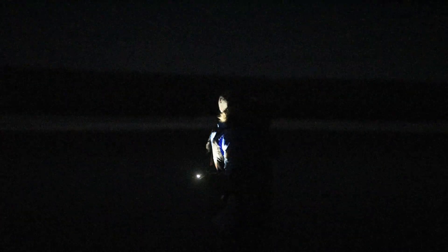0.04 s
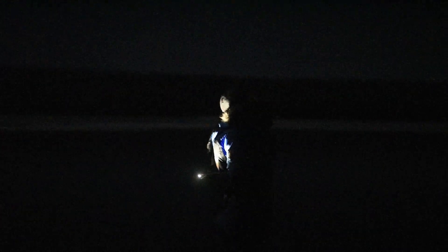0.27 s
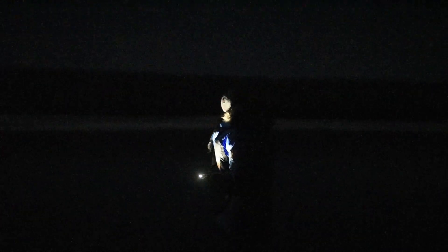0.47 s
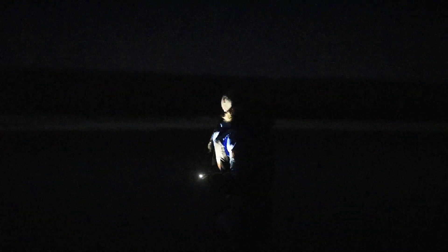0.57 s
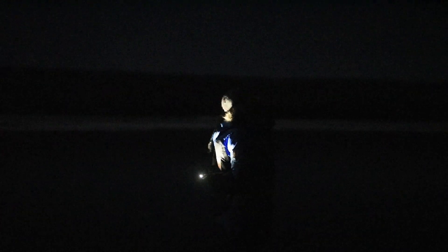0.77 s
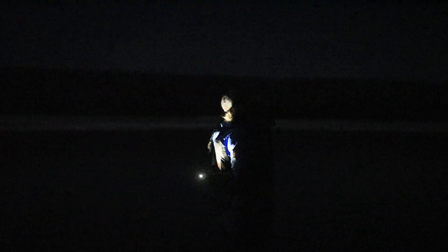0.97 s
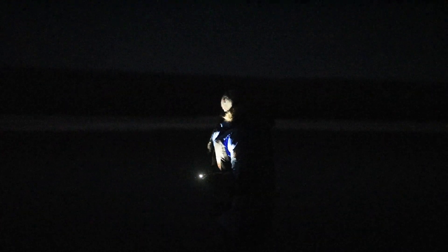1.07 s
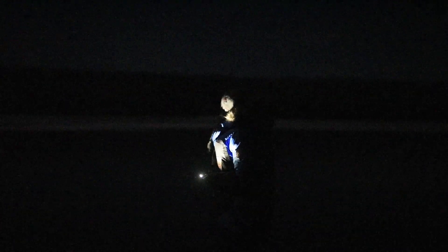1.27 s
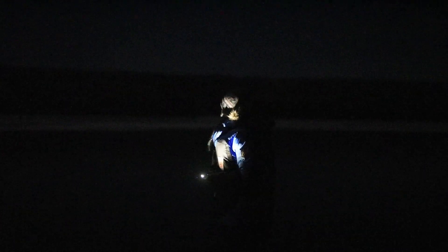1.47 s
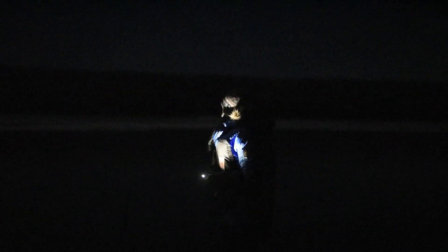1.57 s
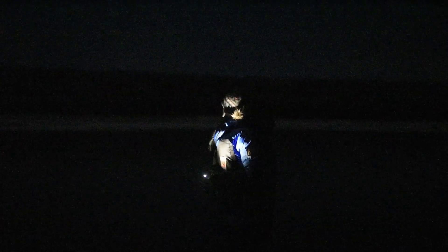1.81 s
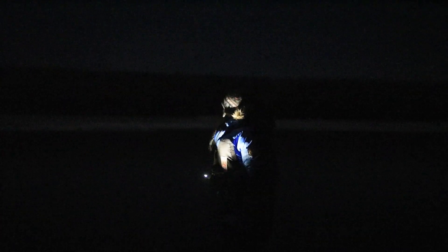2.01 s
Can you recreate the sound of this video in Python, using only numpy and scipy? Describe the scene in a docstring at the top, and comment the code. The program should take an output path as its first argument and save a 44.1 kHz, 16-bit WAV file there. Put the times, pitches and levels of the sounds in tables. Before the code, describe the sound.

A stone strikes a frozen lake, bounces ever faster and skitters away, the ice ringing.

```python
"""A stone thrown onto a frozen lake at night lands, bounces ever faster and skitters away.
Each blow bends the ice: a short singing wave outruns the airborne clack. After the hard landings
the sheet rings on and a low whoop returns. The sliding stone keeps the ice humming and ticking.
Behind it lies still night air, and light wind buffets the right microphone."""
import sys
import numpy as np
from scipy import signal
from scipy.fft import rfft, irfft, next_fast_len
from scipy.io import wavfile
from scipy.ndimage import uniform_filter1d

SR = 44100
rng = np.random.default_rng(int(sys.argv[2]) if len(sys.argv) > 2 else 0)


def pcm_store(signal):
    """Save signal as 16-bit PCM."""
    levels = np.round(np.clip(np.atleast_2d(signal), -1, 1) * 32767)
    wavfile.write(sys.argv[1], SR, levels.astype(np.int16).T)


N = 90404
T = np.arange(N) / SR
SIDE = np.array([[1], [-1]])  # opposite polarity left and right


def amp(db):
    """Decibels to gain."""
    return 10 ** (np.asarray(db) / 20)


def curve(rows):
    """A fader ride through (seconds, dB) points."""
    return amp(np.interp(T, *np.array(rows).T))


def fade(start, seconds):
    """Sudden start and exponential decay."""
    return (T >= start) * np.exp(-np.maximum(T - start, 0) / seconds)


def swell(crest, rise, fall):
    """Bell-shaped envelope with its own rise and fall, in seconds."""
    return np.exp(-.5 * ((T - crest) / np.where(T < crest, rise, fall)) ** 2)


def colour(x, points):
    """Minimum-phase EQ through (Hz, dB) points that keeps the power of white noise."""
    hz, db = np.array(points).T
    size = 2 * next_fast_len(len(x) // 2 + 2048)
    gain = amp(np.interp(np.log(np.fft.rfftfreq(size, 1 / SR) + 1), np.log(hz), db))
    cepstrum = irfft(np.log(gain / np.sqrt(np.mean(gain ** 2))))
    cepstrum[1:size // 2] *= 2
    cepstrum[size // 2 + 1:] = 0
    return irfft(rfft(x, size) * np.exp(rfft(cepstrum)))[:len(x)]


def noise(points):
    """Coloured noise of level 1."""
    return colour(rng.standard_normal(N), points)


def flutter(hz):
    """Smooth random wobble with a spread of 1."""
    hold = int(SR / hz)
    steps = np.repeat(rng.standard_normal(N // hold + 1), hold)
    wobble = uniform_filter1d(uniform_filter1d(steps, hold), hold)[:N]
    return wobble / wobble.std()


def grains(per_second, spread_db):
    """Random tiny impacts of uneven size, level 1."""
    hits = (rng.random(N) < per_second / SR) * rng.standard_normal(N)
    hits *= amp(spread_db * rng.standard_normal(N))
    return hits / hits.std()


def add(out, start, x):
    """Mix a short sound in at its time."""
    i = int(start * SR)
    out[i:i + len(x)] += x[:N - i]


def widen(make, side_db=-10.5):
    """Two draws of a scattered sound, as centre and weaker side."""
    return make() + amp(side_db) * make() * SIDE


# Tone of the night air. Each row: frequency in Hz, relative level in dB.
AIR_EQ = [(40, -19), (150, -41.5), (300, -23), (600, -29), (1100, -34), (2400, -39.5), (4000, -42),
          (7000, -39.5), (10000, -37.5), (13000, -49.5), (16000, -47)]

def night_air():
    """A faint, wide bed of still air."""
    return amp(-64.5) * (noise(AIR_EQ) + 1.18 * noise(AIR_EQ) * SIDE)


# Tone of the wind rumble. Each row: frequency in Hz, relative level in dB.
WIND_EQ = [(15, -13), (30, -7), (52, -1), (90, -5), (140, -11), (220, -24.5), (400, -35), (1000, -84)]
# The gusts. Each row: time in seconds, level on the right in dB.
GUST_RIDE = [(0, -39), (.07, -70), (.082, -43), (.17, -38), (.21, -41.5), (.32, -53.5), (.41, -32),
             (.45, -51), (.48, -32.5), (.63, -37), (.68, -44.5), (.85, -40), (.91, -37), (1.0, -48.5),
             (1.045, -33), (1.14, -37.5), (1.22, -53.5), (1.31, -41.5), (1.355, -38), (1.4, -55),
             (1.52, -49), (1.545, -29.5), (1.6, -43.5), (1.68, -58), (2.05, -55.5)]

def wind(left_db=-25.5):
    """Gusts buffet the right microphone and barely touch the left."""
    return curve(GUST_RIDE) * np.array([amp(left_db) * noise(WIND_EQ), noise(WIND_EQ)])


# Tone of the scrape. Each row: frequency in Hz, relative level in dB.
SCRAPE_EQ = [(800, 2.5), (1500, -7.5), (2400, 1.5), (4200, -7), (6800, -2.5), (8000, -10), (10300, -2.5),
             (13000, -9.5), (16000, -16)]
# Swells of the scrape. Each row: time in seconds, level in dB.
SCRAPE_RIDE = [(0, -65.5), (.3, -76.5), (.5, -67), (.58, -71.5), (.8, -71), (.87, -62.5), (.97, -70),
               (1.18, -70.5), (1.24, -60), (1.31, -68.5), (1.44, -62), (1.6, -62), (1.8, -66), (2.05, -72)]

def scrape():
    """The sliding stone hisses: a dense stream of tiny impacts."""
    return curve(SCRAPE_RIDE) * colour(grains(5500, spread_db=2.5), SCRAPE_EQ)


# Tone of the humming sheet. Each row: frequency in Hz, relative level in dB.
HUM_EQ = [(80, -21), (200, -7), (300, -8), (480, -19.5), (620, -10), (705, -4.5), (755, -0.5), (815, -12),
          (930, -21), (1400, -33), (3000, -44.5)]
# Swells of the hum. Each row: time in seconds, level in dB.
HUM_RIDE = [(0, -70), (.8, -57.5), (1.0, -55.5), (1.25, -50.5), (1.35, -54), (1.41, -46.5), (1.5, -53.5),
            (1.68, -55.5), (1.76, -53.5), (1.86, -53.5), (1.93, -52), (2.05, -51)]

def slide_hum():
    """Small knocks from the sliding stone keep the sheet humming."""
    return curve(HUM_RIDE) * widen(lambda: colour(grains(500, spread_db=3.5), HUM_EQ))


# Tone of the ice chips. Each row: frequency in Hz, relative level in dB.
CHIPS_EQ = [(800, 6.5), (2000, -4), (4500, -6), (9000, -2.5), (12000, -2.5), (16000, -13)]

def chips(start):
    """A landing throws up a quickly thinning spray of chips."""
    return amp(-47) * fade(start, 0.044) * colour(grains(9000, spread_db=1), CHIPS_EQ)


# Tone of the fizz. Each row: frequency in Hz, relative level in dB.
FIZZ_EQ = [(600, 7.5), (2500, -1.5), (5000, -10.5), (9000, -7.5), (15000, -37)]

def fizz(start, lead_s=0.021):
    """A faint hiss that crests just ahead of a clack."""
    return amp(-43) * swell(start - lead_s, rise=0.0033, fall=0.024) * noise(FIZZ_EQ)


# Base tone of stone striking ice. Each row: frequency in Hz, relative level in dB.
CONTACT_EQ = [(300, 3.5), (1200, 7.5), (2000, 2.5), (3000, -1.5), (4600, -6.5), (7000, -6), (9500, -5.5),
              (13000, -8), (16000, -14.5)]

def contact(decay_ms, bright_hz, lift_db, width_octaves=0.41, size=2048):
    """A burst of crushed ice, lifted around one bright region."""
    decay = np.exp(-T[:size] * 1000 / decay_ms)
    burst = rng.standard_normal(size) * decay
    for _ in range(3):  # even out the spectrum while keeping the burst short
        burst = irfft(np.exp(1j * np.angle(rfft(burst)))) * decay ** .25
    burst *= np.linalg.norm(decay) / np.linalg.norm(burst)
    hz = np.geomspace(200, 17000, 48)
    eq_hz, eq_db = np.array(CONTACT_EQ).T
    base_db = np.interp(np.log(hz), np.log(eq_hz), eq_db)
    bell = np.exp(-.5 * (np.log2(hz / bright_hz) / width_octaves) ** 2)
    return colour(burst, np.c_[hz, base_db + lift_db * bell])


# Light touches of the stone. Each row: start in seconds, level in dB, bright region in Hz.
SKITTER_TICKS = [(0.861, -48, 1440), (0.895, -53, 1800), (1.0704, -47.5, 2900), (1.089, -49, 2500),
                 (1.1965, -51, 2660), (1.227, -50, 9700), (1.26, -39.5, 8600), (1.276, -49.5, 1710),
                 (1.3268, -48.5, 10300), (1.327, -51, 2400), (1.3581, -51, 5840), (1.417, -46, 11800),
                 (1.5965, -43.5, 9300), (1.7076, -43.5, 7500), (1.7592, -44.5, 6450), (1.785, -53, 6500),
                 (1.8556, -52, 9900), (1.855, -48, 2630), (1.8718, -48, 7750), (1.9282, -47, 2500)]

def ticks():
    """The skittering stone grazes the ice: tiny contacts with the lows thinned out."""
    out = np.zeros(N)
    for start, db, bright_hz in SKITTER_TICKS:
        low_cut = signal.butter(2, 0.3 * bright_hz, "high", fs=SR, output="sos")
        tick = contact(decay_ms=1, bright_hz=bright_hz, lift_db=11.5)
        add(out, start, amp(db) * signal.sosfilt(low_cut, tick))
    return out


# Modes of the stone. Each row: pitch in Hz, relative level in dB, time to fall 60 dB in ms.
STONE_MODES = [(1294, -20, 14), (2880, -15, 16), (5570, -21, 14), (7000, -13, 11), (8220, 0, 11),
               (8650, -7, 8), (10380, -10, 9), (11110, -10, 9), (13150, -15, 7)]
# Hard hits of stone on ice. Each row: start in seconds, level in dB, decay in ms,
# bright region in Hz, its lift in dB.
HARD_HITS = [(0.2387, -9, 1.74, 9100, 8), (0.2433, -28.5, 4.2, 9000, 9.5),
             (0.6177, -22.5, 0.82, 15000, 13.5), (0.6216, -22.5, 0.93, 2360, 9),
             (0.6223, -25.5, 0.84, 10600, 5), (0.8049, -33.5, 1.9, 7250, 10.5),
             (0.8082, -30.5, 0.83, 9500, 37), (0.8076, -36.5, 2.4, 2170, 26), (0.81, -42.5, 3.9, 7000, 8),
             (0.9597, -37.5, 1.2, 2480, 1.5), (1.0329, -39, 0.8, 3600, 7), (1.2504, -44.5, 1.6, 2660, 19),
             (1.3874, -33, .6, 6600, 21)]

def clacks():
    """The airborne crack of each hit; the harder the blow, the more the stone rings."""
    out, t = np.zeros(N), T[:2048]
    modes = sum(amp(db - 60 * t * 1000 / t60_ms) * np.sin(2 * np.pi * hz * t)
                for hz, db, t60_ms in STONE_MODES)
    hardest_db = HARD_HITS[0][1]
    for start, db, decay_ms, bright_hz, lift_db in HARD_HITS:
        ringing = amp(0.85 * (db - hardest_db)) * modes
        add(out, start, amp(db) * (contact(decay_ms, bright_hz, lift_db) + ringing))
    return out


def whoop(start, thud_db, delay_s=0.138, crest_hz=300, rise_hz_per_s=470):
    """A low, rough, slightly rising echo that returns over the lake."""
    crest = start + delay_s
    phase = 2 * np.pi * np.cumsum(crest_hz + rise_hz_per_s * (T - crest)) / SR
    scatter = flutter(hz=120) * np.sin(phase) + flutter(hz=120) * np.cos(phase)
    tone = (np.sin(phase) + 0.8 * scatter) / 2
    return amp(-22 + 0.79 * thud_db) * swell(crest, rise=0.035, fall=0.035) * tone


# Tone of the sheet's singing tail. Each row: frequency in Hz, relative level in dB.
NOTE_TAIL_EQ = [(300, -24), (520, -2.5), (650, 8), (740, 12.5), (820, -14.5), (950, -9.5), (1400, -48.5),
                (3000, -53)]
# Tone of the sheet's low tail. Each row: frequency in Hz, relative level in dB.
THUD_TAIL_EQ = [(60, -18), (130, -3), (200, -2), (300, 1), (420, -6), (600, -5), (800, -10.5),
                (1100, -39.5), (2500, -49)]

def sheet_ring(landings):
    """Waves scatter through the sheet: a strong early bloom, then a singing tail and a longer low one."""
    def tail(levels_db, eq, t60_s):
        power = 0
        for start, db in zip(starts, levels_db):
            attack = 1 - fade(start, 0.0027)
            decay = amp(16) * fade(start, 0.013) + fade(start, t60_s / np.log(1000))
            power += (amp(db) * attack * decay) ** 2
        return np.sqrt(power) * widen(lambda: noise(eq))

    starts, notes_db, thuds_db = np.array(landings).T
    singing = tail(notes_db - 33.5, NOTE_TAIL_EQ, t60_s=0.94)
    return singing + tail(thuds_db - 28.5, THUD_TAIL_EQ, t60_s=1.73)


# Bending waves of the singing note and of the low thud. Each row: pitch in Hz, relative level in dB,
# rise in ms, fall in ms, lead of the crest over the clack in ms.
NOTE_PARTIALS = [(756, -3.5, 2.56, 3.35, 2.57), (942, -17, 3.6, 1.3, 1.31)]
THUD_PARTIALS = [(167.3, -6.5, 4.4, 3.3, 2.3), (261.7, -3, 5.3, 2.3, 3.33), (390, -7, 3.75, 1, 6.86),
                 (511, -5.5, 2.46, 1.65, 2.79)]

def bending_waves(start, note_db, thud_db):
    """A blow bends the ice: waves swell ahead of the airborne clack and die just after it."""
    out = np.zeros(N)
    for blow_db, partials in (note_db, NOTE_PARTIALS), (thud_db, THUD_PARTIALS):
        for hz, db, rise_ms, fall_ms, lead_ms in partials:
            crest = start - lead_ms / 1000
            envelope = swell(crest, rise_ms / 1000, fall_ms / 1000)
            out -= amp(blow_db + db) * envelope * np.cos(2 * np.pi * hz * (T - crest))
    return out


# The stone's landings. Each row: start in seconds, level of the note in dB, level of the thud in dB.
LANDINGS = [(0.2387, -11.5, -10), (0.6175, -12, -22), (0.8058, -18.5, -32.5), (0.9585, -24.5, -32),
            (1.0326, -32.5, -41.5), (1.0895, -39, -46), (1.1605, -38.5, -53), (1.1965, -39.5, -47),
            (1.229, -51, -45), (1.276, -37.5, -46), (1.396, -53, -70), (1.4335, -38, -55),
            (1.498, -43, -54.5), (1.559, -44, -67), (1.752, -56, -58), (1.929, -36.5, -47.5)]

def struck_ice():
    """The sheet sings under every landing; the first three echo back and the first five ring on."""
    blows = sum(bending_waves(*landing) for landing in LANDINGS)
    echoes = sum(whoop(start, thud_db) for start, _, thud_db in LANDINGS[:3])
    return blows + echoes + sheet_ring(LANDINGS[:5])


def microphone_pair(x, lag_s=14e-6, treble_gap_db=2, corner_hz=1300):
    """Sharp sounds reach the right microphone a little later and with less treble than the left."""
    hz = np.fft.rfftfreq(N, 1 / SR)
    tilt = amp(treble_gap_db / 2 * hz ** 2 / (hz ** 2 + corner_hz ** 2))
    lag = np.exp(-2j * np.pi * hz * lag_s)
    return irfft(rfft(x) * np.array([tilt, lag / tilt]), N)


def scene():
    """Ice and stone straight ahead, wind on the right, still night air around."""
    background = wind() + night_air()
    ice = struck_ice() + slide_hum()
    first_hit = HARD_HITS[0][0]
    stone = clacks() + ticks() + chips(first_hit) + fizz(first_hit) + scrape()
    return background + ice + microphone_pair(stone)


def record(dry, top_hz=16400):
    """The recorder clips at full scale and cuts the top."""
    high_cut = signal.ellip(8, .2, 70, top_hz, fs=SR, output="sos")
    return signal.sosfilt(high_cut, np.clip(dry, -1, 1))


dry = scene()
out = record(dry)
pcm_store(out)
```